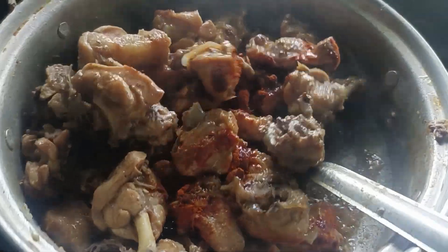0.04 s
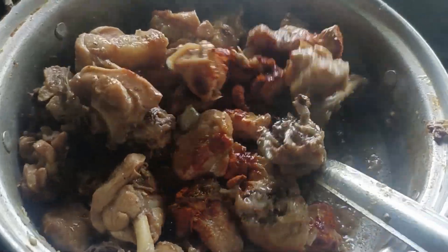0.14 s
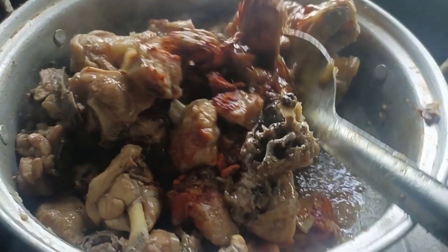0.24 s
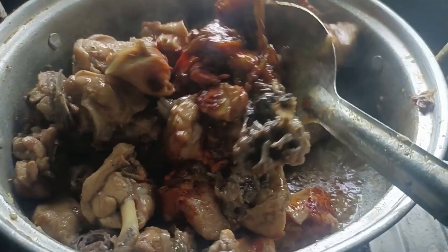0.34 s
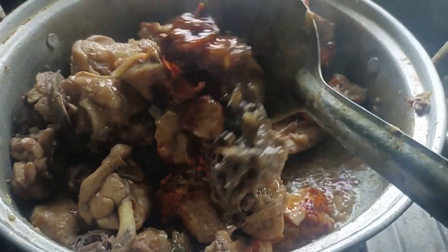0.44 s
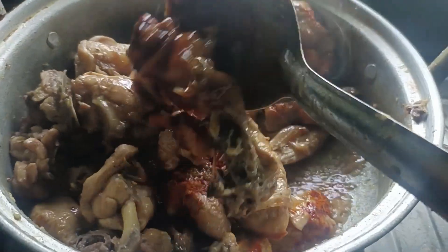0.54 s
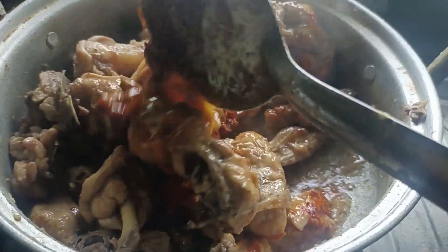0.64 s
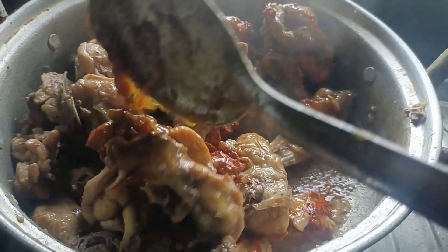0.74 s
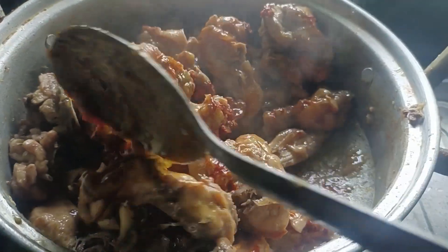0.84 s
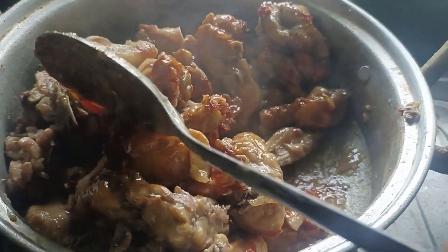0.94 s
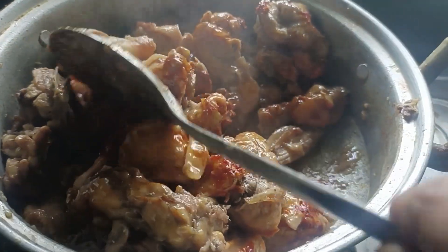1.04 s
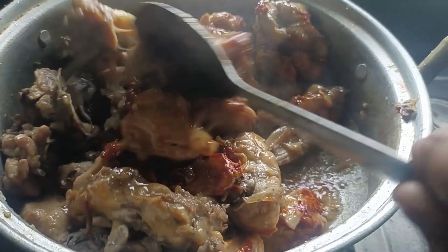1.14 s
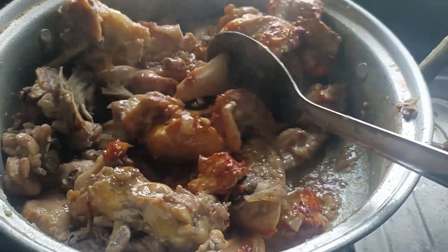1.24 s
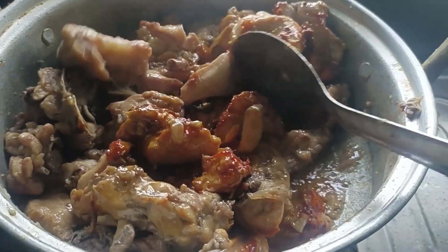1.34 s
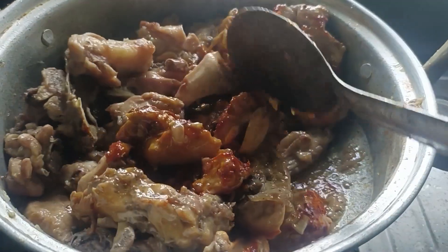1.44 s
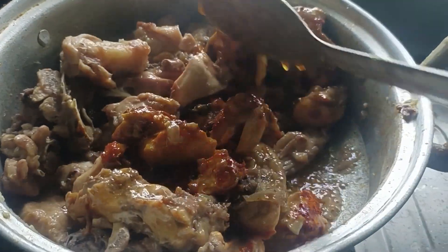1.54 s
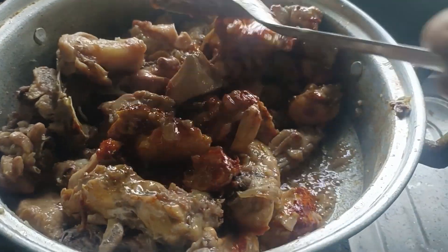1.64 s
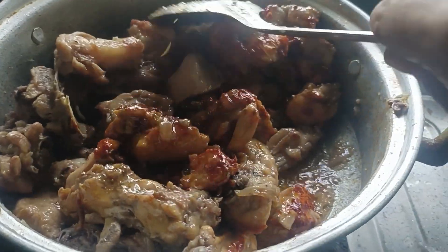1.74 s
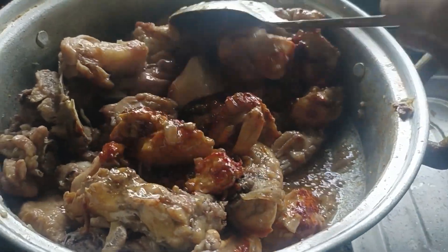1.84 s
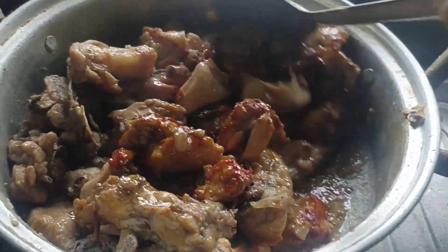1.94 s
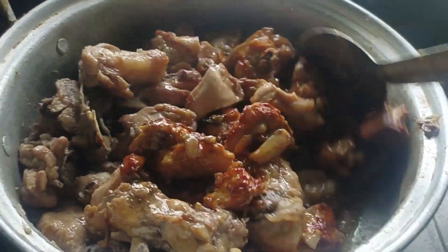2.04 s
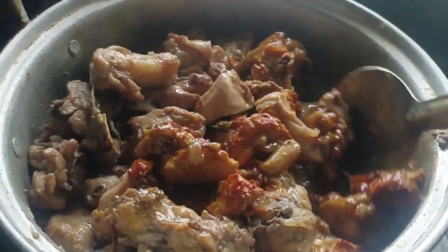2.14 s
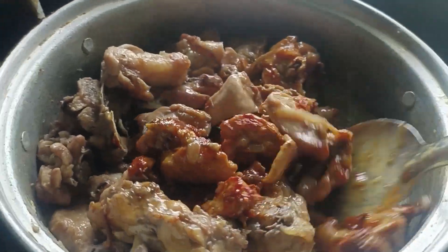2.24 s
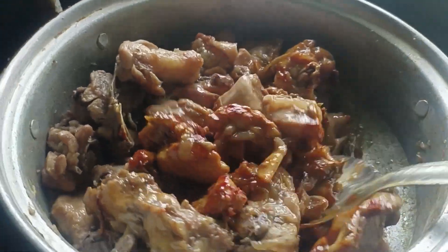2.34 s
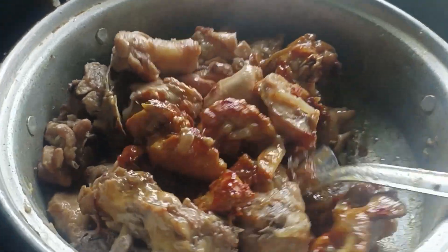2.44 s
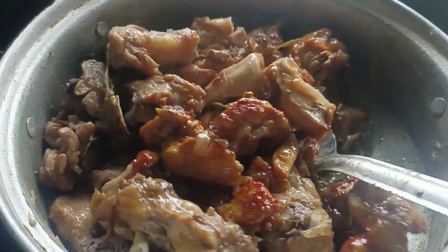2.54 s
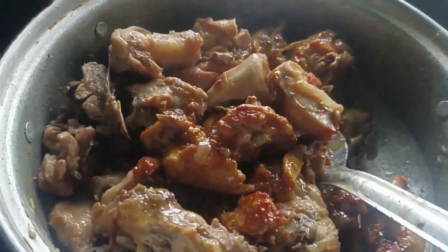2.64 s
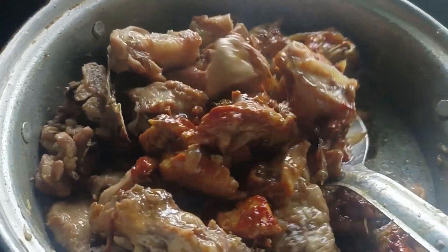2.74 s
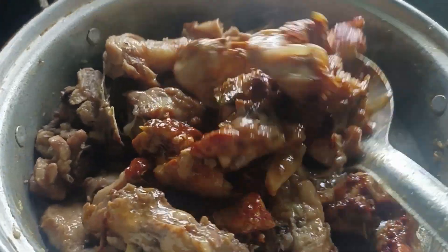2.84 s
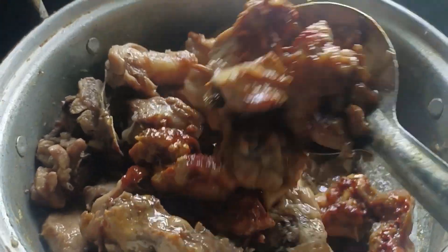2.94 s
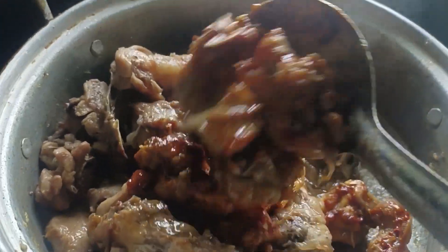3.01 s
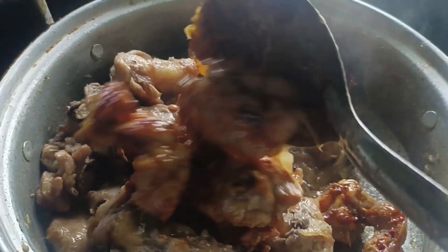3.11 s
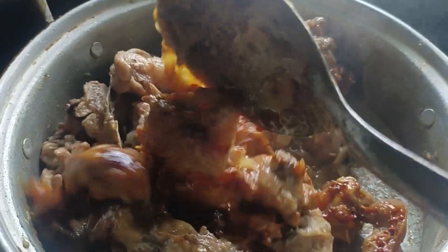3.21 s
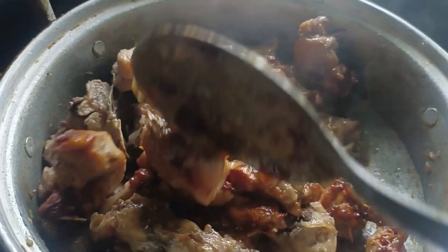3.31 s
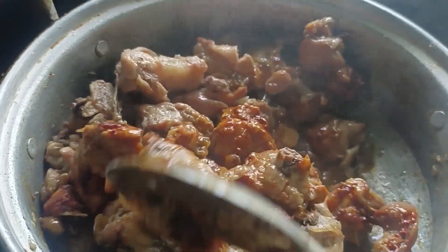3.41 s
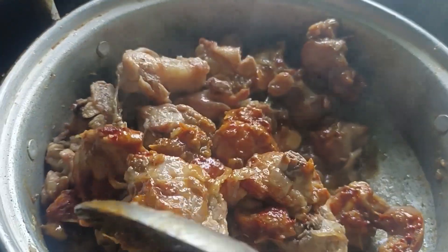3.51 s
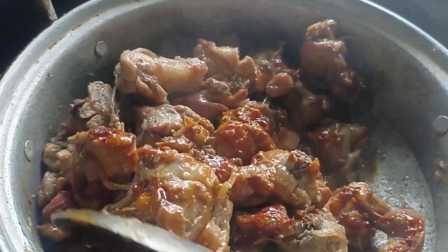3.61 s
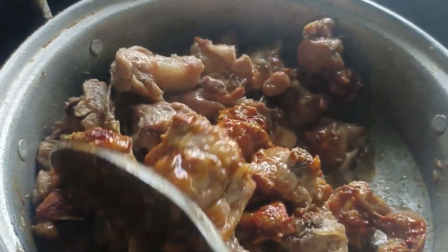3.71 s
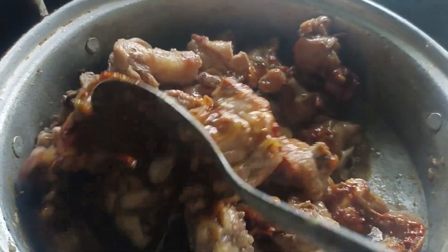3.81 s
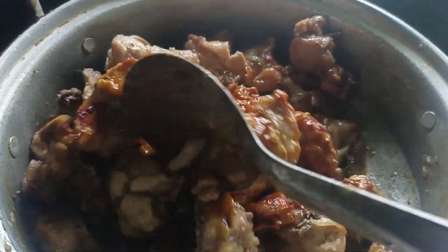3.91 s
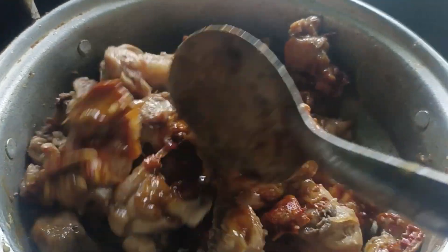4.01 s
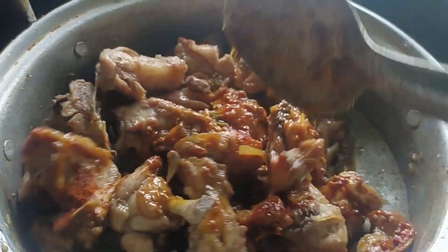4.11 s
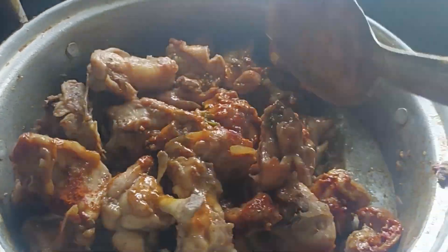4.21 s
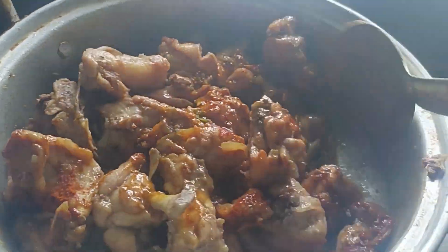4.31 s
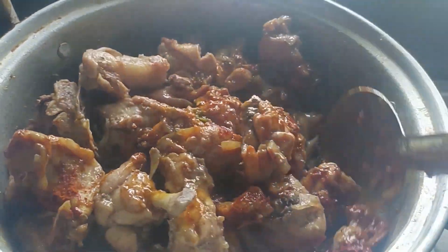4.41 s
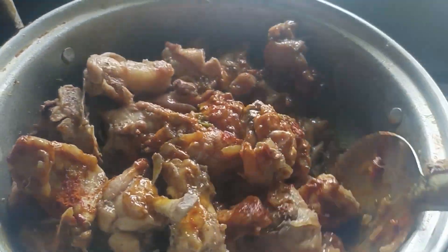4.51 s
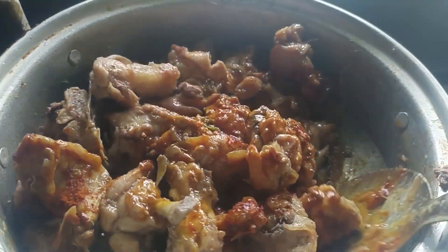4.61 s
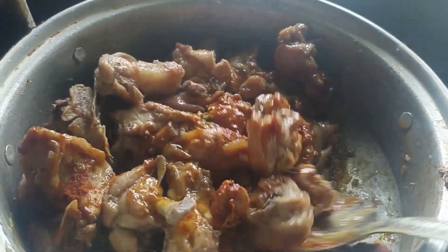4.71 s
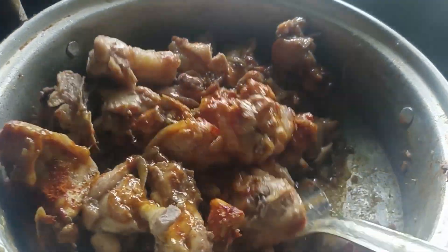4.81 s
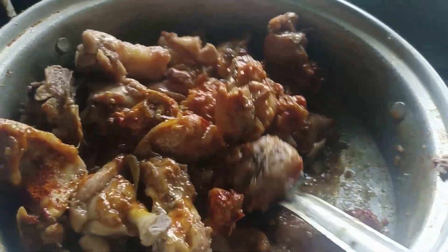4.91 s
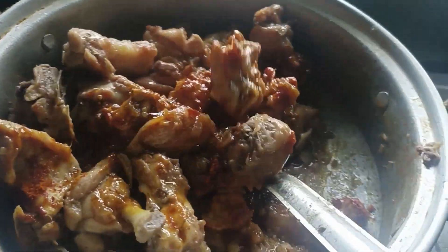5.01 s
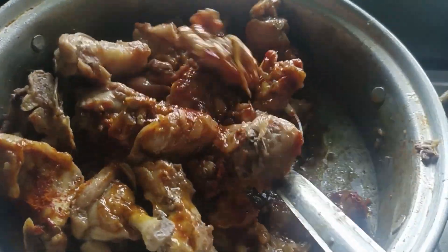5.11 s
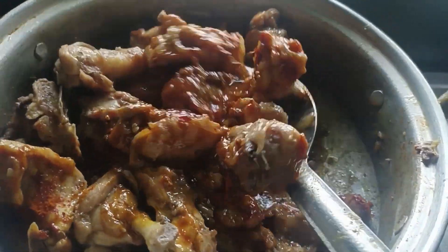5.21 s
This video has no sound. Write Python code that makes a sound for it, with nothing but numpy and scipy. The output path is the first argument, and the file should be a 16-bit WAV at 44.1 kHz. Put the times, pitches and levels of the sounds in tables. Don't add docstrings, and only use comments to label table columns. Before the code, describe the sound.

Close cooking sounds: crisp frying, two bursts of gritty spoon scraping and sharp metallic knocks, plus distant thuds and faint birds in a kitchen.

```python
import sys
import numpy as np
from scipy import signal
from scipy.fft import rfft, irfft, next_fast_len
from scipy.io import wavfile
from scipy.ndimage import uniform_filter1d

SR = 44100
rng = np.random.default_rng(int(sys.argv[2]) if len(sys.argv) > 2 else 0)


def gain_from_db(level_db):
    decades = np.asarray(level_db, float) / 20
    return 10 ** decades


def materialize(psi):
    bounded = np.clip(np.atleast_2d(psi).T, -1, 1)
    quanta = np.round(bounded * 32767).astype(np.int16)
    wavfile.write(sys.argv[1], SR, quanta)


N = 231766


def rms_one(x):
    return x / np.sqrt(np.mean(x ** 2) + 1e-20)


def white_noise():
    return rng.standard_normal((2, N))


def butter(x, order, hz, kind):
    return signal.sosfilt(signal.butter(order, hz, kind, fs=SR, output="sos"), x)


def in_time(rows):
    s, *columns = np.transpose(rows)
    return np.array([np.interp(np.arange(N) / SR, s, c) for c in columns])


def at_hz(points, hz):
    table_hz, values = np.transpose(points)
    return np.interp(np.log(hz), np.log(table_hz), values)


def octaves_off(hz, spot_hz):
    return abs(np.log2(hz / spot_hz))


def drift(rate):
    r = np.exp(-80 * np.pi * rate / SR)
    slow = signal.lfilter([1], [1, -2 * r, r * r], rng.standard_normal(N // 40 + 2002))[2000:]
    return np.interp(np.arange(N) / 40, np.arange(len(slow)), rms_one(slow))


def grains(per_s, spread_db):
    sizes = gain_from_db(spread_db * np.minimum(rng.exponential(1, (2, N)), 5))
    signs = rng.choice([-1, 1], (2, N))
    return rms_one(sizes * signs * (rng.random((2, N)) < per_s / SR))


def bank(source, spectrum, shape=lambda hz: 1, patchy_db=0):
    low, high = spectrum[0][0], min(spectrum[-1][0], .45 * SR)
    edges = np.geomspace(low, high, int(2.5 * np.log2(high / low)) + 2)
    centres = np.sqrt(edges[1:] * edges[:-1])
    levels = gain_from_db(at_hz(spectrum, centres))
    levels = levels / np.sqrt(np.sum(levels ** 2 * np.diff(edges)) * 2 / SR)
    source = source + 1e-18
    sources = source, np.roll(source, 9973, axis=1)
    out = np.zeros((2, N))
    for k, hz in enumerate(centres):
        flicker = gain_from_db(patchy_db * drift(9.7)) if patchy_db else 1
        band = butter(sources[k % 2], 2, edges[k:k + 2], "band")
        out += band * (levels[k] * flicker * shape(hz))
    return out


def ring(drive, modes):
    out = 0
    for k, (hz, level_db, t60_s) in enumerate(modes):
        r, w = gain_from_db(-60 / (t60_s * SR)), 2 * np.pi * hz / SR
        mode = signal.lfilter([0, np.sin(w)], [1, -2 * r * np.cos(w), r * r], drive(hz) + 1e-18)
        out = out + (-1) ** k * gain_from_db(level_db) * mode
    return out


def strikes(times, levels_db, scatter_db):
    clicks = np.zeros((2, N))
    luck = rng.standard_normal((len(times), 2))
    size = gain_from_db(levels_db + scatter_db * luck[:, 0])
    clicks[:, (times * SR).astype(int)] = size, size * np.clip(luck[:, 1], -1, 1)
    return clicks


def dying(times, gains, rise_s, t60_s):
    out = np.zeros(N)
    for s, gain, rise, decay in zip(*np.broadcast_arrays(times, gains, rise_s, t60_s)):
        start, decay = int(s * SR), max(decay, .01)
        t = np.arange(min(N - start, int(decay * SR))) / SR
        out[start:start + len(t)] += gain * (1 - np.exp(-t / max(rise, 1e-4))) * gain_from_db(-60 * t / decay)
    return out


def efforts(times, held_s, levels_db, rise_db_per_s, fall_db_per_s):
    t = np.arange(N) / SR
    out = np.zeros(N)
    for s, hold, level_db in zip(*np.broadcast_arrays(times, held_s, levels_db)):
        near = slice(max(int((s - .3) * SR), 0), int((s + hold + .5) * SR))
        rise_db = rise_db_per_s * np.maximum(s - t[near], 0)
        fall_db = fall_db_per_s * np.maximum(t[near] - s - hold, 0)
        out[near] += gain_from_db(level_db - rise_db - fall_db)
    return uniform_filter1d(out, size=200)


# frequency in Hz, level in dB per Hz.
HUM_SPECTRUM = [(25, -26), (32, -99), (75, 10), (156, -3), (221, 9), (578, -8.5), (772, -4.5), (1070, -0.5),
                (1320, -2.5), (1510, 0.5), (2230, -2.5), (2500, 16.5), (3250, -21), (5500, -120)]


def hum():
    return gain_from_db(-65) * bank(white_noise(), HUM_SPECTRUM, patchy_db=4.5)


# start in seconds, held in seconds, pitch in Hz, glide in Hz per s, level in dB.
BIRD_CALLS = [
    (1.019, 0.077, 770, 100, -55),
    (1.12, 0.096, 790, 96, -61),
    (1.388, 0.078, 705, -150, -65.5),
    (1.514, 0.042, 615, -200, -67.5),
]
# start in seconds, from Hz, to Hz, length in seconds, level in dB.
BIRD_CHIRPS = [(2.755, 4150, 3750, .04, -49), (2.8, 1960, 1860, .05, -52), (3.25, 4900, 4400, .04, -55),
               (3.52, 4300, 3600, .045, -54), (5.0, 1750, 1450, .045, -51)]


def birds():
    out, t = np.zeros(N), np.arange(N) / SR
    for s, held_s, hz, glide, level_db in BIRD_CALLS:
        pitch_hz = (hz + glide * (t - s)) * (1 + 0.037 * drift(80))
        tone = np.sin(2 * np.pi * np.cumsum(pitch_hz) / SR)
        out += efforts([s], held_s, level_db, 496, 496) * gain_from_db(4.2 * drift(47)) * tone
    for s, from_hz, to_hz, length_s, level_db in BIRD_CHIRPS:
        pitch_hz = np.linspace(from_hz, to_hz, int(length_s * SR))
        tone = np.sin(2 * np.pi * np.cumsum(pitch_hz) / SR)
        start = int(s * SR)
        out[start:start + len(tone)] += gain_from_db(level_db) * np.hanning(len(tone)) * tone
    return out * [[1], [-.8]]


# centre in seconds, peak in dB, length in seconds.
PHONE_JOLTS = [(0.623, -50, 0.093), (1.28, -70, 0.15), (2.596, -55.5, 0.13), (4.398, -56.5, 0.086),
               (4.64, -61, 0.18), (5.254, -34, 0.018)]


def jolts():
    t = np.arange(N) / SR
    lumps = sum(gain_from_db(peak_db) * np.exp(-((t - s) / length_s) ** 2 * 4) for s, peak_db, length_s in PHONE_JOLTS)
    return lumps * rms_one(butter(white_noise(), 2, [30, 120], "band"))


# start in seconds, peak in dB, breadth in dB, first blow in dB, strongest Hz.
DISTANT_BANGS = [
    (0.004, -17, -1, -5, 256),
    (0.248, -18, -0.5, -9.5, 246),
    (0.298, -21.5, -2.5, -15, 333),
    (0.503, -24, -7.5, -21, 330),
    (0.513, -18.5, -3, -6.5, 320),
    (2.877, -27, -9.5, -2.5, 625),
    (3.001, -25.5, -4.5, -10, 400),
    (3.012, -20, -3.5, -9, 270),
    (5.234, -33.5, 5, 0.5, 260),
]
# frequency in Hz, level in dB per Hz.
BANG_SPECTRUM = [(24, -34), (40, -46.5), (166, -15.5), (228, -7), (329, -5.5), (421, -10.5), (796, -11),
                 (1040, -17), (1180, -14), (2990, -25), (6240, -49.5), (10200, -71), (14000, -37)]
# frequency in Hz, t60 in seconds.
ROOM_T60 = [(60, 0.34), (250, 0.31), (700, 0.31), (2000, 0.27), (6000, 0.47)]
# frequency in Hz, level in dB, t60 in seconds.
STOVE_MODES = [(85, -14, .4), (131, -8, .4), (205, -19, .35), (243, 1, .54), (285, -10, .3), (323, 1, .33),
               (362, -8, .3), (435, -12, .3), (475, -9, .3), (519, -8, .3), (687, -12, .35),
               (793, -13, .35), (935, -15, .33), (1197, -16, .3), (1300, -18, .25), (1605, -20, .22),
               (398, -9, .2), (732, -14, .3), (899, -16, .28), (1434, -16, .3), (1523, -20, .3),
               (1780, -19, .2), (2046, -19, .26), (2315, -19, .22)]


def bangs():
    s, peak_db, breadth_db, blow_db, spot_hz = np.transpose(DISTANT_BANGS)
    white = white_noise()

    def colour_db(hz):
        lows, highs = np.clip(np.log2(200 / hz), 0, 1), np.clip(np.log2(hz / 700), 0, 1)
        return peak_db + (8.5 + 0.8 * breadth_db) * lows + (1 + breadth_db) * highs

    def swell(hz):
        build_s = .012 * (250 / hz) ** 0.53
        return dying(s, gain_from_db(colour_db(hz)), build_s, at_hz(ROOM_T60, hz) * (1 - 0.0622 * breadth_db))

    def thud(hz):
        click_db = colour_db(hz) + blow_db - 20 * (hz < 200) - 3.5 * octaves_off(hz, spot_hz)
        return gain_from_db(-49) * white * swell(hz) + strikes(s, click_db, scatter_db=1)

    gate = np.clip(efforts(s, .28, 0, rise_db_per_s=1000, fall_db_per_s=400), gain_from_db(-16), 1)
    return gate * (gain_from_db(-5) * bank(white, BANG_SPECTRUM, swell) + ring(thud, STOVE_MODES))


# time in seconds, sizzle in dB, big-bubble share in dB.
FRYING_LEVELS = [(0.0, -48, -83), (0.6, -48.5, -43.5), (1.0, -49, 5), (1.95, -49, 11.5), (2.17, -43.5, 20),
                 (2.32, -56, 27), (2.66, -53.5, 21), (2.8, -51.5, -78), (3.5, -52.5, -38),
                 (3.88, -49, 17.5), (4.13, -51.5, 12), (4.36, -51.5, -68), (4.9, -49, 19), (5.26, -50, -27)]
# frequency in Hz, level in dB per Hz.
SIZZLE_SPECTRUM = [(1300, -73), (1900, -19.5), (2400, -10.5), (2900, 1), (3800, 2), (6000, 2.5), (9000, -6),
                   (16500, -10)]


def sizzle():
    level_db, big_db = in_time(FRYING_LEVELS)
    fizz = grains(per_s=11000 * gain_from_db(1.5 * drift(13)), spread_db=3.3)

    def bubbles(hz):
        return gain_from_db(level_db - 0.5 + big_db * np.clip(np.log2(4200 / hz), 0, 1))

    def singing(hz):
        return fizz * gain_from_db(level_db + 4.86 * drift(8.9))

    bubble_tones = [(hz, 0, .1) for hz in (2780, 3050, 3260, 3450, 3690, 3820, 4360, 5480, 5820)]
    return bank(fizz, SIZZLE_SPECTRUM, bubbles, patchy_db=1.2) + gain_from_db(-43) * ring(singing, bubble_tones)


# start in
# seconds, peak in dB, struck spot in Hz.
BOTTOM_CLONKS = [(2.043, -42, 395), (2.084, -24.5, 1043), (2.365, -38.5, 830), (2.414, -34, 415),
                 (2.446, -22, 690), (2.877, -19.5, 750), (3.843, -33, 455), (4.335, -32, 690),
                 (4.559, -42, 604), (4.851, -27.5, 653), (5.054, -33, 1026), (5.094, -51, 520)]
# frequency in Hz, level in dB, t60 in seconds.
CLANK_MODES = [(395, -3, .12), (455, 0, .15), (520, 0, .14), (600, -3, .12), (690, 0, .14), (800, -3, .12),
               (930, -3, .12), (1050, -5, .1)]


def clonks():
    s, peak_db, spot_hz = np.transpose(BOTTOM_CLONKS)
    crumbs = butter(white_noise(), 2, 300, "high")

    def blow(hz):
        off = octaves_off(hz, spot_hz)
        crumble = crumbs * dying(s, gain_from_db(peak_db - 29.5 - 117 * off), rise_s=0.00053, t60_s=0.26)
        return crumble + strikes(s + 0.0022, peak_db - 7 - 60 * off, scatter_db=3)

    return ring(blow, CLANK_MODES)


# full force at seconds, held in seconds, boom in dB, clank share in dB, clank Hz.
LOAD_SHOVES = [(2.06, 0.015, -45, -5, 400), (2.099, 0.041, -38.5, 3.5, 442), (2.172, 0.036, -58.5, 6, 433),
               (2.29, 0.053, -51, -13.5, 393), (2.438, 0.055, -36, 4, 670), (2.598, 0.074, -37.5, -12, 545),
               (2.783, 0.0037, -47, -10, 745), (3.859, 0.063, -56, -1, 646), (4.344, 0.0028, -43.5, 4, 495),
               (4.409, 0.073, -48.5, 1.5, 448), (4.503, 0.0089, -44, -1, 514), (4.58, 0.071, -37, -7, 445),
               (4.7, 0.039, -51, -10, 400), (4.864, 0.012, -45, 9.5, 665), (4.931, 0.047, -50, -5.5, 470),
               (5.1, 0.049, -40, -8.5, 513), (5.222, 0.0046, -49, -7, 500)]
# full contact at seconds, held in seconds, level in dB.
EDGE_DRAGS = [(2.007, 0.074, -39.5), (2.111, 0.079, -35), (2.25, 0.43, -44.5), (2.48, 0.033, -39.5),
              (2.621, 0.032, -38.5), (2.7, 0.055, -44.5), (3.81, 0.018, -58), (4.35, .02, -36),
              (4.395, 0.11, -35), (4.57, 0.04, -41), (4.735, 0.015, -34.5), (4.82, 0.07, -38),
              (4.93, 0.061, -49), (5.062, 0.027, -41.5)]
# frequency in Hz, level in dB per Hz.
SCRAPE_SPECTRUM = [(600, -42), (950, 1.5), (1280, -9), (1700, -3), (2300, 0), (4000, -9), (6000, -2),
                   (10000, -9.5), (16500, -4.5)]
# frequency in Hz, level in dB, t60 in seconds.
BOOM_MODES = [(216.7, 4, 0.095), (243.6, 4.5, 0.24), (280, -2.5, 0.21), (326.2, -2.5, 0.093)]
# frequency in Hz, level in dB, t60 in seconds.
WALL_MODES = [(1000, -6, .08), (1200, 0, .09), (1300, -4, .08), (1605, -6, .07), (2060, -2, .07),
              (2370, -3, .07), (2850, -4, .06), (3450, -7, .05), (3790, -6, .05), (5480, -12, .04),
              (6250, -12, .03)]
# frequency in Hz, level in dB, t60 in seconds.
HOLLOW_MODES = [(1275, -1, 0.018), (2357, -0.5, 0.01), (3870, -20.5, 0.014)]


def scrape():
    s, held_s, boom_db, share_db, spot_hz = np.transpose(LOAD_SHOVES)
    shake = grains(per_s=2300 * gain_from_db(2 * drift(27)), spread_db=2.5)
    rasp = efforts(*np.transpose(EDGE_DRAGS), rise_db_per_s=491, fall_db_per_s=296)
    grit = rasp * grains(per_s=2500 * gain_from_db(2.4 * drift(21)), spread_db=3)

    def force(level_db):
        return efforts(s, held_s, level_db, rise_db_per_s=896, fall_db_per_s=389)

    def clank(hz):
        return force(boom_db + share_db - 20 * octaves_off(hz, spot_hz)) * shake * gain_from_db(2 * drift(18))

    boom = gain_from_db(-1) * force(boom_db) * rms_one(ring(lambda hz: shake, BOOM_MODES))
    bottom = boom + gain_from_db(-26) * ring(clank, CLANK_MODES)
    thump = ring(lambda hz: strikes(s, boom_db - 1.5, scatter_db=2), BOOM_MODES)
    thump = signal.lfilter([.1], [1, -.9], thump)
    wall = gain_from_db(-42) * ring(lambda hz: grit * gain_from_db(4 * drift(13)), WALL_MODES[1:7])
    hollow = gain_from_db(-33) * ring(lambda hz: grit * gain_from_db(2 * drift(15)), HOLLOW_MODES)
    return bottom + thump + wall + hollow + gain_from_db(-9.5) * bank(grit, SCRAPE_SPECTRUM, patchy_db=2.5)


# start in seconds, held in seconds, level in dB.
RIM_CHATTER = [(.156, .005, -43), (1.68, .06, -72), (1.84, 0.044, -44.5), (2.048, .005, -60),
               (2.084, .005, -47), (2.338, 0.0077, -42), (2.385, 0.012, -29), (2.44, 0.05, -42),
               (2.59, .01, -50), (2.84, 0.035, -59), (3.147, .004, -39), (4.323, .004, -42),
               (4.336, .004, -46), (4.385, 0.077, -39.5), (4.61, .005, -57), (4.655, 0.0046, -52),
               (4.693, 0.016, -34.5), (4.798, .005, -52)]
# start in seconds, peak in dB, strongest Hz.
SPOON_TAPS = [(0.146, -40, 15200), (0.6016, -37, 14000), (0.8085, -41, 15100), (1.679, -31, 12300),
              (1.7389, -69, 15300), (1.839, -33, 13700), (2.0456, -35, 15700), (2.338, -26, 14900),
              (2.384, -21, 15000), (2.819, -38, 15060), (2.846, -36, 15240), (3.148, -36, 13900),
              (4.323, -23, 12900), (4.3778, -29, 15200), (4.3955, -28, 15200), (4.6058, -42, 14000),
              (4.6487, -38, 14700), (4.695, -42, 13600), (5.166, -38, 15700), (5.2194, -35, 12300)]
# frequency in Hz, level in dB, t60 in seconds.
SPOON_MODES = [(7300, -22, .06), (8660, -11, .12), (9450, -10, .1), (9700, -16, .07), (12220, -13, .07),
               (12950, -20, .05), (13900, -5, .06), (13990, -8, .09), (14450, -11, .05), (14710, -7, .07),
               (14870, -6, .08), (15100, -6, .05), (15240, 0, .08), (15340, -3, .05), (15650, -11, .04)]


def spoon():
    s, peak_db, spot_hz = np.transpose(SPOON_TAPS)
    contact = efforts(*np.transpose(RIM_CHATTER), rise_db_per_s=2500, fall_db_per_s=350)
    rub = gain_from_db(-29.5) * contact * grains(per_s=2500, spread_db=-2)

    def drive(hz):
        tap_db = peak_db - 6 - 20 * np.minimum(octaves_off(hz, spot_hz), .3)
        return rub * gain_from_db(2.7 * drift(5.2)) + strikes(s, tap_db, scatter_db=4)

    return ring(drive, SPOON_MODES)


# start in seconds, peak in dB, brightness in dB, t60 in seconds, clack Hz.
POT_KNOCKS = [(0.2494, -9.5, -21.5, 0.38, 1010), (0.2999, -15.5, -27, 0.37, 1180),
              (0.345, -23.5, -2, 0.058, 5500), (0.5057, -13, -21, 0.067, 1200),
              (0.6839, -25, -17, 0.1, 3800), (1.229, -25, -17, 0.25, 1730),
              (1.989, -20.5, -30, 0.062, 2880), (2.0843, -5.5, -27, 0.29, 1200),
              (2.173, -12.5, -21, 0.073, 3370), (2.304, -20.5, -12, 0.068, 3450),
              (2.366, -25, -25, 0.11, 1510), (2.3878, -22, -15, 0.12, 2400), (2.4462, -17, -19, 0.12, 1190),
              (2.4673, -9, -19, 0.53, 2370), (2.5864, -16.5, -14, 0.18, 2380), (2.594, -17, -30, 0.1, 2060),
              (2.6337, -20.5, -11, 0.05, 1660), (2.8457, -24, -8, 0.1, 5320), (3.0016, -15, -18, 0.11, 980),
              (3.052, -33, 7, 0.05, 6000), (3.116, -21, -17, 0.35, 3070), (3.6722, -28, -6, 0.12, 3740),
              (3.7076, -31, -23, 0.092, 3840), (3.781, -23.5, -25, 0.11, 3360),
              (4.0265, -27.5, -2.5, 0.17, 2920), (4.3349, -4, -11, 0.15, 2060),
              (4.395, -15.5, -30, 1, 2370), (4.495, -14.5, -27, 0.17, 2980), (4.565, -26, -20, 0.21, 1290),
              (4.7272, -12, -51, 0.16, 2270), (4.7971, -16, -16.5, 0.35, 2440),
              (5.0804, -23, -36, 0.2, 1190), (5.235, -12, -21.5, 0.43, 1090)]


def knocks():
    s, peak_db, bright_db, t60_s, clack_hz = np.transpose(POT_KNOCKS)

    def blow(off_spot_db, scatter_db):
        return lambda hz: strikes(s, peak_db - 16 - off_spot_db * octaves_off(hz, clack_hz), scatter_db)

    def tail(hz):
        bright = bright_db * np.clip(np.log2(hz / 4000), 0, 1)
        gain = gain_from_db(peak_db + bright - 2.9 * np.maximum(np.log2(clack_hz / hz), 0))
        firm = np.clip((peak_db + 25.5) / 14, 0, 1)
        crack = dying(s, gain * firm, rise_s=0.00075, t60_s=0.013)
        return gain_from_db(1) * crack + gain_from_db(-14.5) * dying(s, gain, 0.004, t60_s)

    wall = ring(blow(19.6, 3.5), [(hz, db, 0.65 * t) for hz, db, t in WALL_MODES])
    hollow = ring(blow(7.6, 6), HOLLOW_MODES)
    spectrum = [(600, 3.5), (1200, 13.5), (2500, 5.5), (6000, 15.5), (9000, 22), (16500, 10)]   # Hz, dB per Hz
    return wall + hollow + bank(white_noise(), spectrum, tail)


# frequency in Hz, left-right likeness from 0 to 1.
STEREO_LIKENESS = [(60, 0.99), (130, 0.83), (290, 1), (640, 0.31), (1400, 0.077), (3000, 0.013),
                   (7000, 0.011), (15000, 0.029)]
# frequency in Hz, left minus right in dB.
STEREO_LEAN = [(60, -3), (92, -2), (140, 0), (210, 1.5), (330, -5), (500, 2), (770, -1), (1170, 1),
               (1790, -2), (2740, 0.5), (4190, -3), (6200, -7.5), (7600, 6), (9810, 7), (12000, 2),
               (15000, 1)]
# frequency in Hz, gain in dB.
MICROPHONE_COLOUR = [(3000, 0), (3750, 4), (4700, -3), (5500, 2), (6250, 2), (6700, -5), (8300, -3),
                     (9100, -9), (9700, -6), (11000, -10), (12500, -4), (15300, 0), (15800, -1),
                     (16050, -70)]


def scene():
    far = hum() + birds() + jolts() + bangs()
    pot = sizzle() + clonks() + scrape() + spoon() + knocks()
    size = next_fast_len(N)
    mid, side = rfft(far + pot, size)
    hz = np.maximum(np.arange(len(mid)) * SR / size, 1)
    alike, lean = np.clip(at_hz(STEREO_LIKENESS, hz), 0, 1), gain_from_db(at_hz(STEREO_LEAN, hz) / 2)
    mid, side = mid * np.sqrt(1 + alike), side * np.sqrt(1 - alike)
    late = np.exp(-2j * np.pi * hz * 13 / 44100)
    ports = np.array([(mid + side) * lean * late, (mid - side) / lean])
    return irfft(ports * gain_from_db(at_hz(MICROPHONE_COLOUR, hz)), size)[:, :N]


def low_pass(x):
    return signal.sosfilt(signal.butter(12, 16970, fs=SR, output="sos"), x)


def record(dry):
    mix = butter(dry, 3, 62, "high")
    return low_pass(mix)


dry = scene()
out = record(dry)
materialize(out)
```